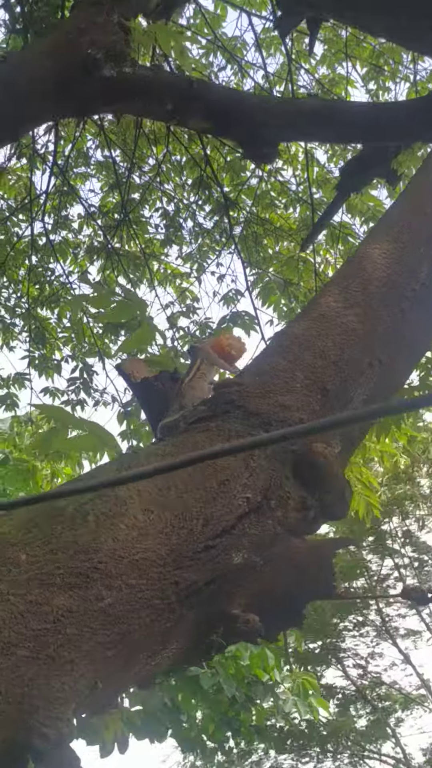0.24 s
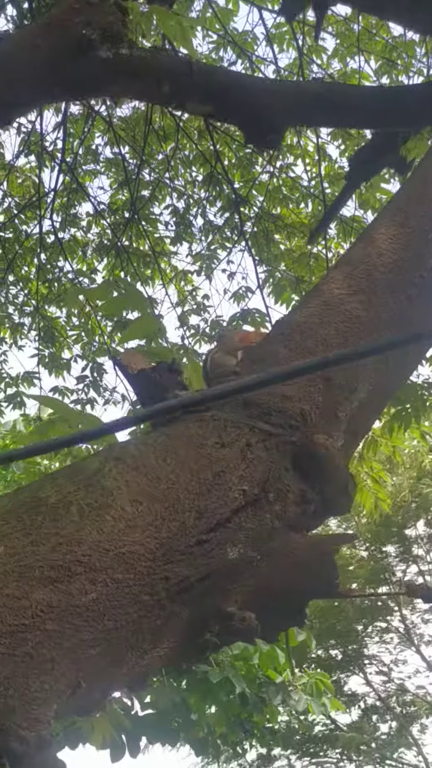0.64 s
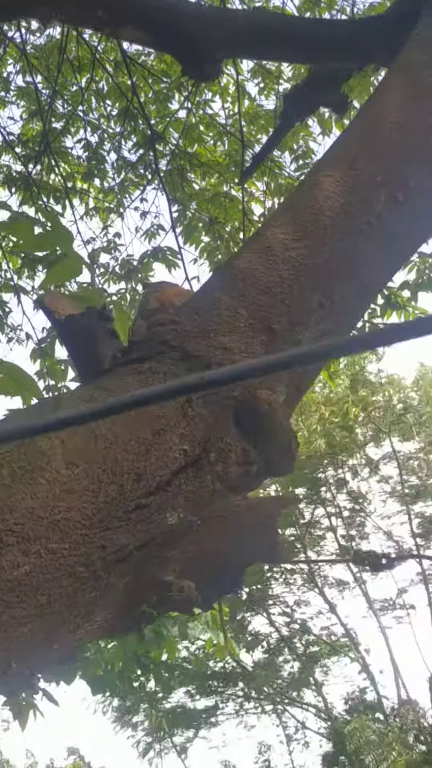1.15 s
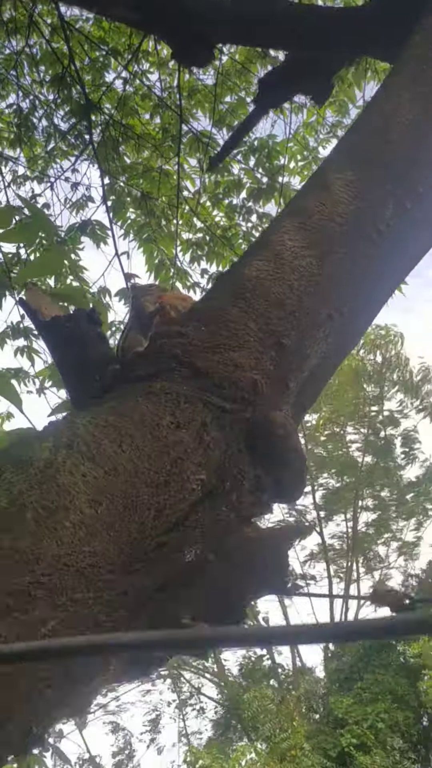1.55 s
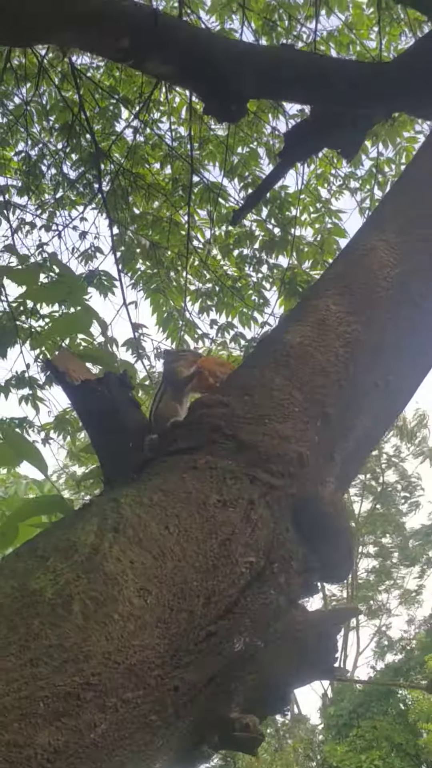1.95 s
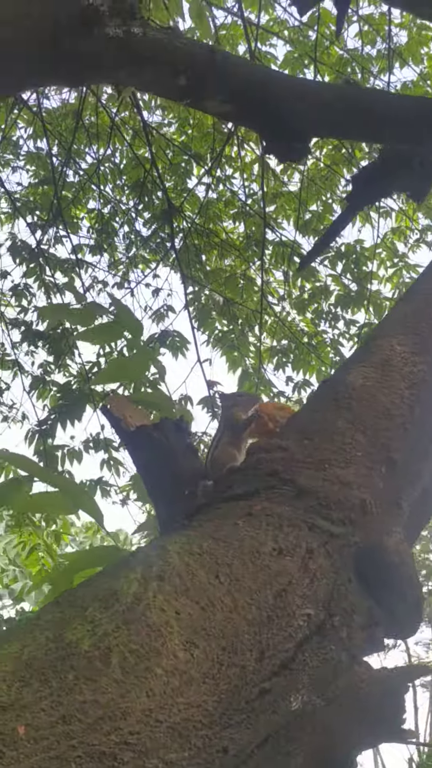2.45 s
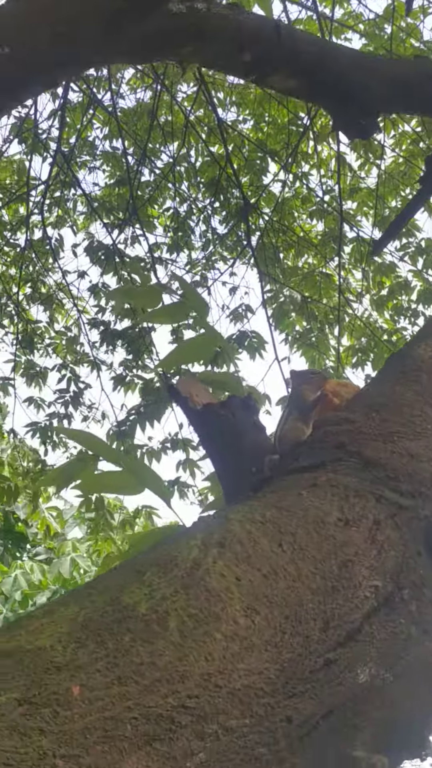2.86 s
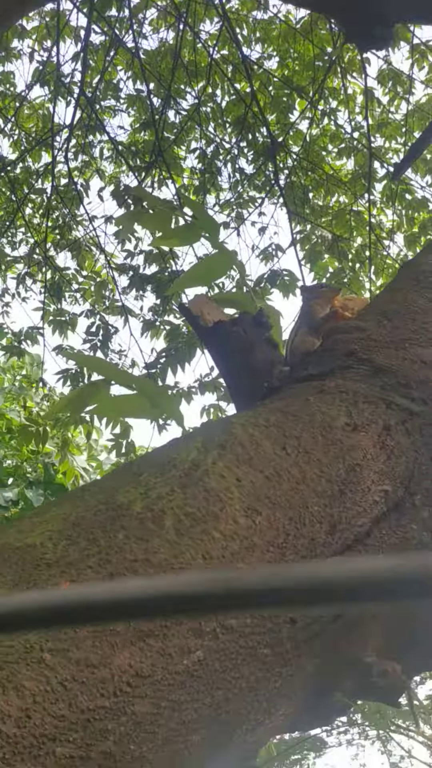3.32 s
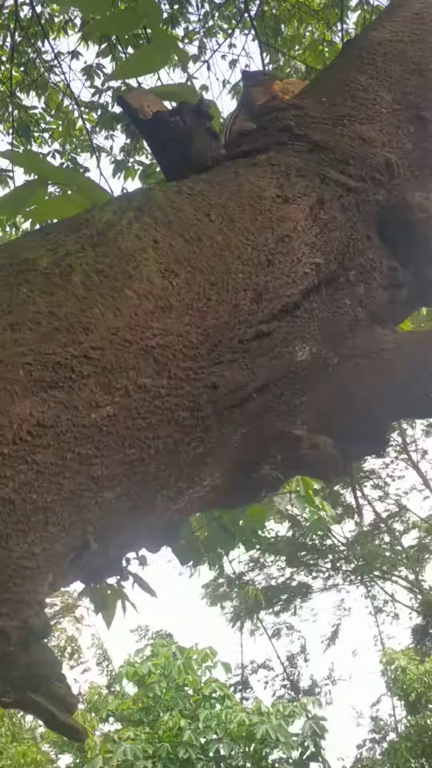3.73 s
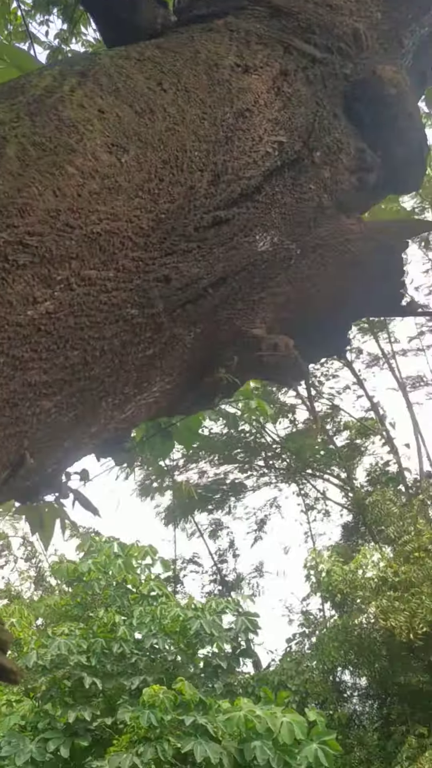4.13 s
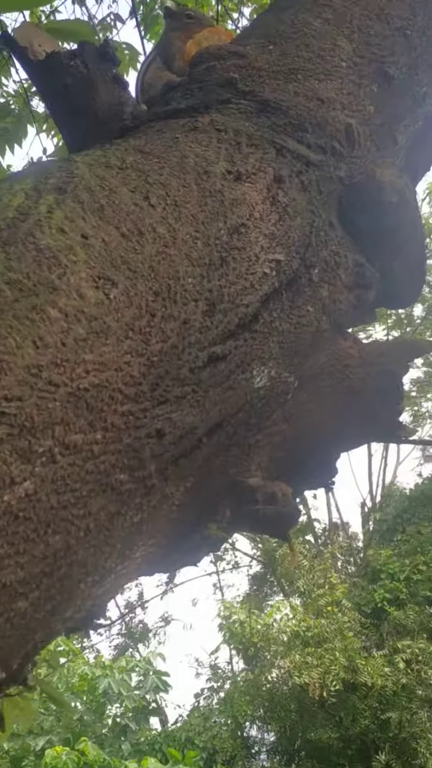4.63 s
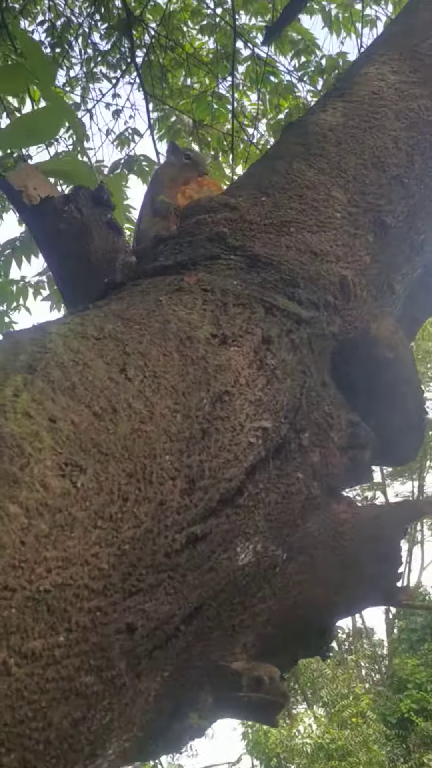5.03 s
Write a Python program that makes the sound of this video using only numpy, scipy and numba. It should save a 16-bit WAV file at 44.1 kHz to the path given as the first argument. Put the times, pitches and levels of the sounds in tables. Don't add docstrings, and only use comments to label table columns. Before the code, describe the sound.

A quiet outdoor bed of leaf hiss and distant town hum runs throughout, with soft, low wind buffeting that shifts between the two microphones of a handheld phone. A faint cloth brush comes at 0.7 s, and a tiny, high, falling bird whistle around 1 s. At about 2.05 s a squirrel in the tree gives a dry, harsh rasp, a quarter second of fast buzzing pulses with hissy breath, slightly echoed by trunk and branches. A very faint dove coos low at 2.5 and 2.95 s. A weaker, breathier rasp follows at 2.8 s and the strongest at 3.6 s, swelling late. Wind gusts get heavier from 3.7 s, mostly left. Faint whistles descend around 4.0-4.2 s. At 4.29 s a hard finger knock clicks sharply on the right, with a small rebound and dull thud. Cloth scrapes faintly at 4.45 s and more clearly at 4.7 s, then wind continues to the end.

```python
import sys
import numpy as np
from scipy import signal
from scipy.fft import rfft, irfft
from scipy.io import wavfile
from scipy.ndimage import uniform_filter1d
from numba import njit

SR = 44100
rng = np.random.default_rng(int(sys.argv[2]) if len(sys.argv) > 2 else 0)


def ratio_of_db(decibels):
    return 10 ** (np.asarray(decibels, float) / 20)


def to_wav(s):
    ch = np.atleast_2d(s).T
    pcm = np.round(np.clip(ch, -1, 1) * 32767)
    wavfile.write(sys.argv[1], SR, pcm.astype(np.int16))


N = 233020
TIME = np.arange(N) / SR
LOG_HZ = np.log(np.maximum(np.arange(N // 2 + 1) * SR / N, 1))
SILENT_DB = -36
# onset t/s, lead-in/s, length/s, loudest at share of the length, effort level/dB
RASPS = [
    (2.058, .03, .248, 0.5, -36.5),
    (2.80, .065, .216, .22, -38.3),
    (3.59, .022, .253, .6, -34.8),
]


def squirrel():
    # t/s, f/Hz
    pulses = [(2.04, 81), (2.12, 79.5), (2.2, 80.2), (2.36, 77.5), (2.76, 78.6), (2.88, 82.7), (2.96, 80.8),
              (3.58, 77.2), (3.62, 78.2), (3.68, 83.4), (3.74, 83.8), (3.88, 83.5)]
    # share of the cycle, level/dB
    rebounds = [(.33, -3.5), (.52, -2.5), (.74, -4)]
    # f/Hz, width/Hz, level/dB
    throat = [(860, 320, -16), (1065, 400, -8.5), (1390, 490, -6.5), (1680, 380, -8), (2558, 320, -16)]
    # low mouth mode f/Hz, high mouth mode f/Hz, breath f/Hz, breath level/dB, hiss level/dB
    mouths = [(1803, 2230, 4590, -16.5, -12), (1860, 2245, 4470, -9.5, -13.5),
              (1900, 2190, 4530, -17, -10.5)]
    # share of the breath f, width/Hz, level/dB
    breath = [(0.98, 650, 1.5), (1.25, 1500, -3)]
    # f/Hz, width/Hz, level/dB
    hisses = [(6250, 2460, -0.5), (7530, 2260, 1), (9070, 1500, -3.5), (11300, 2200, -2),
              (14700, 1500, -14)]
    left_lag = 19
    shade_db = 7
    air_per_db, rough_loud, rough_per_db = .55, .2, .2

    under_db, progress, which = effort()
    low_hz, high_hz, breath_hz, breath_db, hiss_db = np.transpose(mouths)[:, which]
    high_hz = high_hz + 60 * (2 * progress - 1)
    high_db = np.interp(progress, [0, 1], (-5.5, 2))
    breath_db = breath_db - air_per_db * under_db
    hiss_db = hiss_db - air_per_db * under_db / 2
    rough = np.clip(rough_loud - rough_per_db * under_db, 0, .7)

    hz = np.interp(TIME, *np.transpose(pulses))
    turns = np.cumsum(hz * (1 + .004 * walk(60))) / SR
    cycle, phase = turns.astype(int), turns % 1
    shimmer = ratio_of_db(1.0 * rng.standard_normal(N // 200))[cycle]
    first = np.exp(-phase * SR / hz / 3)
    snap = first.copy()
    for share, db in rebounds:
        since = (phase - share - .012 * walk(9)) % 1
        snap += ratio_of_db(db + 2.5 * walk(15)) * np.exp(-since * SR / hz / 3)
    gate = .45 + np.exp(-phase / 0.4)
    rasp = unit(gate * rng.standard_normal(N))
    drive = shimmer * (unit(snap - snap.mean()) + 1.6 * rough * rasp)

    voice = steep(drive, low_hz, 300) - ratio_of_db(high_db) * steep(drive, high_hz, 400)
    voice = voice / np.sqrt(uniform_filter1d(voice ** 2, size=400))
    voice = voice + modes(unit(first - first.mean()) + 1.7 * rasp, throat)

    gain = (ratio_of_db(under_db) - ratio_of_db(SILENT_DB)) * ratio_of_db(np.transpose(RASPS)[-1][which] - 2.5)
    breath = [(share * breath_hz, width, db) for share, width, db in breath]
    out = []
    for side in range(2):
        air = gate * rng.standard_normal(N)
        shaded = [(f, w, db - shade_db * (1 - side) * (f / 12000) ** 2) for f, w, db in hisses]
        hiss = ratio_of_db(hiss_db - 1.5) * modes(air, shaded)
        puffs = ratio_of_db(breath_db - 2.0) * modes(air, breath)
        near = gain * (voice + puffs + hiss)
        out.append(canopy(late(near, left_lag * (1 - side)), side))
    return np.array(out)


def effort():
    attack_s, release_s = .025, .054
    onset, lead, length, share, _ = np.transpose(RASPS)
    end = onset + length
    which = np.searchsorted(end[:-1] + 2 * release_s + attack_s, TIME)
    s = np.array([onset - lead - attack_s, onset - lead, onset, onset + share * length,
                  end, end + release_s, end + 2 * release_s])
    shape_db = [SILENT_DB, -23, -6.5, 0, -3.5, -19, SILENT_DB]
    under_db = np.interp(TIME, s.T.ravel(), np.tile(shape_db, len(RASPS)))
    progress = np.clip((TIME - onset[which]) / length[which], 0, 1)
    return under_db, progress, which


def modes(x, table):
    out = 0
    for hz, width, db in table:
        ring = unit(steep(x, hz * (1 + .025 * walk(9)), width))
        out = out + ratio_of_db(db + 1.2 * walk(14)) * ring
    return out


def canopy(x, side):
    # left delay/ms, left level/dB, right delay/ms, right level/dB
    echoes = [(3.63, -7, 3.65, -7), (5.71, -6, 5.2, -6), (8.9, -9, 9.4, -9), (14.6, -10, 13.3, -10),
              (23.0, -12, 26.2, -12), (37, -16, 41, -16)]
    sway_ms, leaf_t60_s, leaf_db = .12, .12, -1.5
    out = x
    for echo in echoes:
        delay_ms, db = echo[2 * side], echo[2 * side + 1]
        samples = np.round((delay_ms + sway_ms * walk(6)) * SR / 1000)
        out = out + ratio_of_db(db) * late(x, samples)
    tail = rng.standard_normal(8192) * np.exp(-np.log(1000) * TIME[:8192] / leaf_t60_s)
    tail = tail / np.sqrt(np.sum(tail ** 2))
    return out + ratio_of_db(leaf_db) * signal.fftconvolve(x, tail)[:N]


def wind():
    # t/s, level/dB, upper share/dB, left minus right/dB
    breeze = [(0, -54.5, -5, -5), (.8, -51, -7, -2), (1.6, -55.5, -0.5, 0), (3.0, -55, -3.5, 1),
              (3.6, -49.5, -3.5, 2.5), (3.9, -41.5, -2, 9), (4.25, -48, 2, 0), (4.4, -43, 8, 8),
              (4.52, -45, -2, 3), (4.75, -48, -4, 6.5), (4.9, -41.5, 0, 12.5), (5.28, -47.5, -3.5, 5.5)]
    # t/s, peak level/dB, left minus right/dB
    gusts = [(0.05, -40.5, -10), (0.218, -43.5, -8.5), (0.391, -45, 1), (0.579, -43, -1.5),
             (0.711, -44, -1), (0.839, -43, -1.0), (1.039, -45, -1.0), (1.269, -45, -4.5),
             (1.469, -46.5, -14), (1.905, -39.5, -5), (2.125, -37.5, -3), (2.222, -36.5, -8.0),
             (2.611, -43, 9), (3.083, -42, 5), (3.25, -38, 9), (3.339, -37.5, 12), (3.668, -36, 10),
             (3.779, -32, 11), (4.071, -29, 3.5), (4.439, -32, -7), (4.589, -34, 5), (4.719, -36.5, 1),
             (4.839, -32, 11.5), (5.239, -39, 14)]
    rise_s, fall_s, crest_db, gust_upper_db = .03, .07, 7.5, -8
    s, *columns = np.transpose(breeze)
    low_db, upper_db, pan_db = (np.interp(TIME, s, c) for c in columns)
    low = ears(ratio_of_db(low_db), pan_db) ** 2
    upper = ears(ratio_of_db(low_db + upper_db), pan_db) ** 2
    for start, db, gust_pan_db in gusts:
        swell = np.interp(TIME, np.cumsum([start, rise_s, fall_s]), [0, 1, 0])
        gust = ears(ratio_of_db(db - crest_db) * swell, gust_pan_db) ** 2
        low, upper = low + gust, upper + gust * ratio_of_db(2 * gust_upper_db)
    alike = np.clip((-45 - 10 * np.log10(low.mean(axis=0))) / 9, 0, .9)
    out = 0
    for hz, width, gain in ((39, 55, np.sqrt(low)), (95, 110, np.sqrt(upper) * ratio_of_db(-4.5))):
        shared, left, right = (unit(steep(rng.standard_normal(N), hz, width)) for _ in range(3))
        rumble = np.sqrt(alike) * shared + np.sqrt(1 - alike) * np.array([left, right])
        out = out + gain * ratio_of_db(2.0) * rumble
    return out


def knocks():
    # t/s, ring f/Hz, t60/s, right level/dB, left level/dB
    taps = [
        (4.2921, 250, .022, 4.5, -22),
        (4.3272, 285, 0.025, -13, -33),
        (4.316, 85, .07, -45, -17),
        (4.336, 150, 0.049, -45, -19),
    ]
    # t/s, width/s, level/dB
    nail = [
        (4.29246, 0.000064, -5.5),
        (4.29225, 0.00013, -31),
        (4.29285, 0.0001, -15),
    ]
    out = np.zeros((2, N))
    for start, hz, t60, right_db, left_db in taps:
        push_s = .0012 if right_db > 0 else .003
        t = np.maximum(TIME - start, 0)
        ring = np.cos(2 * np.pi * hz * t - .7) * np.exp(-np.log(1000) * t / t60)
        ring = ring * (1 - np.exp(-t / push_s))
        out += np.array([ratio_of_db(left_db) * late(ring, 47), ratio_of_db(right_db) * ring])
    for start, width, db in nail:
        out[1] += ratio_of_db(db) * np.exp(-((TIME - start) / width) ** 2)
    t = np.maximum(TIME - taps[0][0], 0)
    crackle = unit(steep(rng.standard_normal(N), 12300, 8000))
    out[1] += ratio_of_db(-32.5) * crackle * (t > 0) * np.exp(-t / 0.00078)
    return out


def brushes():
    # t/s, hold/s, fall/s, level/dB, left minus right/dB
    strokes = [
        (.705, .02, .02, -50, 4),
        (4.455, 0.061, 0.089, -49.5, 4.5),
        (4.683, 0.043, 0.037, -43, 4),
    ]
    # f/Hz, level/dB per Hz
    colour = [(530, -50), (900, -23), (1530, 1.5), (1720, -4.5), (2300, -2.5), (4520, -7.5), (12100, -11.5),
              (16000, -18)]
    rise_s = .014
    grains = rng.standard_normal((2, N)) * ratio_of_db(1.5 * walk(150))
    cloth = unit(irfft(rfft(grains) * ratio_of_db(over_hz(colour, LOG_HZ)), N))
    shape = 0
    for start, hold, fall, db, pan_db in strokes:
        swell = np.interp(TIME, np.cumsum([start, rise_s, hold, fall]), [0.016, 0.95, 0.65, 0])
        shape = shape + ears(ratio_of_db(db) * swell, pan_db)
    return cloth * shape


def bird():
    # t/s, length/s, start f/Hz, end f/Hz, level/dB
    notes = [(1.006, .048, 5070, 4520, -46.5), (1.052, .065, 4480, 4300, -55),
             (0.898, .02, 7100, 6900, -57), (1.025, 0.053, 4980, 4870, -53),
             (1.107, 0.023, 7240, 6800, -56), (3.992, .045, 6420, 6300, -56),
             (4.053, 0.047, 5660, 5600, -56.5), (4.121, 0.075, 4800, 4720, -53),
             (4.16, .035, 4650, 4250, -56), (4.187, 0.038, 4100, 4050, -49.5)]
    # t/s, length/s, start f/Hz, end f/Hz, level/dB
    coos = [
        (2.501, 0.362, 556, 519, -59.5),
        (2.94, .27, 523.4, 534, -59.5),
    ]
    # t/s, left minus right/dB
    turn_pan = [(1, 4), (4.2, 7)]
    flutter, wobble = ratio_of_db(2.2 * walk(150)), 1 + .012 * walk(200)
    song = sum(flutter * whistle(*note, wobble) for note in notes)
    song = ears(song, np.interp(TIME, *np.transpose(turn_pan)))
    blurred = np.array([canopy(song[side], side) for side in range(2)])
    dove = sum(whistle(*coo, 1 + 0.00786 * walk(20)) for coo in coos)
    return ratio_of_db(-7.5) * song + ratio_of_db(-9.5) * blurred + dove


def whistle(start, length, hz0, hz1, db, wobble):
    u = np.clip((TIME - start) / length, 0, 1)
    hz = (hz0 + (hz1 - hz0) * u) * wobble
    return ratio_of_db(db) * np.sin(2 * np.pi * np.cumsum(hz) / SR) * np.sin(np.pi * u) ** 0.31


def woods():
    # f/Hz, level/dB per Hz
    colour = [(35, -35), (60, -3), (184, -3.5), (250, -1.5), (492, -6), (1200, -7), (7940, -16),
              (16000, -26)]
    # f/Hz, left-right correlation
    likeness = [(60, 0.39), (130, 1), (290, 0.98), (640, 0.72), (1410, 0.078), (3100, 0.062),
                (6820, 0.0022), (15000, -0.05)]
    # f/Hz, left minus right/dB
    balance = [(60, 2), (110, -3), (200, -0.5), (380, -2), (700, -1), (2380, 5), (8120, 0.5), (15000, -4)]
    # t/s, level/dB
    loudness = [(0.0, -48), (5.28, -50.5)]
    mid, side = rfft(rng.standard_normal((2, N))) * ratio_of_db(over_hz(colour, LOG_HZ))
    alike = np.clip(over_hz(likeness, LOG_HZ), -.95, .95)
    mid, side = mid * np.sqrt(1 + alike), side * np.sqrt(1 - alike)
    pair = ears(np.array([mid + side, mid - side]), over_hz(balance, LOG_HZ))
    out, swell, half_octave = 0, walk(1.53), np.log(2) / 2
    for k in range(18):
        distance = np.clip((LOG_HZ - np.log(60)) / half_octave - k, -1, 1)
        band = np.cos(np.pi / 2 * distance) ** 2
        out = out + ratio_of_db(0.56 * swell + 0.87 * walk(8)) * irfft(pair * band, N)
    return unit(out) * ratio_of_db(np.interp(TIME, *np.transpose(loudness)))


def unit(x):
    return x / np.sqrt(np.mean(x ** 2))


def over_hz(table, log_hz):
    hz, value = np.transpose(table)
    return np.interp(log_hz, np.log(np.maximum(hz, 1)), value)


def walk(rate):
    k = int(SR / rate)
    held = np.repeat(rng.standard_normal(N // 200 + 1)[:N // k + 1], k)
    return unit(uniform_filter1d(uniform_filter1d(held, k), k)[:N])


def late(x, samples):
    return np.interp(np.arange(N) - samples, np.arange(N), x, left=0)


def ears(x, pan_db):
    return x * ratio_of_db(np.array([[.5], [-.5]]) * pan_db)


@njit
def svf(x, hz, width):
    y, b, l = np.empty(len(x)), 0., 0.
    for i in range(len(x)):
        g, k = np.tan(np.pi * hz[i] / SR), width / hz[i]
        v = (b + g * (x[i] + 1e-18 - l)) / (1 + g * (g + k))
        b, l, y[i] = 2 * v - b, l + 2 * g * v, k * v
    return y


def steep(x, hz, width):
    hz = hz + np.zeros(N)
    return svf(svf(x, hz, 1. * width), hz, 1. * width)


def scene():
    return squirrel() + wind() + knocks() + brushes() + bird() + woods()


def roll_off(x):
    return signal.sosfilt(signal.butter(12, 16510, fs=SR, output="sos"), x)


def record(dry):
    top_hz, dim_from_hz, dim_db = 15760, 2600, 5.5
    mask_to_hz, mask_under_db, mask_db = 3900, -30, 12
    mid_side = np.array([dry[0] + dry[1], dry[0] - dry[1]]) / 2
    hz, _, cells = signal.stft(mid_side, SR, nperseg=1024)
    size = abs(cells)
    chance = rng.exponential(size=(2, 171, N // 2048 + 2))
    chance = np.repeat(np.repeat(chance, 3, axis=1), 4, axis=2)
    dim = unit(ratio_of_db(-dim_db * chance[:, :len(hz), :cells.shape[2]]))
    quiet = size < 5 * np.median(size, axis=2, keepdims=True)
    rasp = size[:, (hz > 1500) & (hz < dim_from_hz)].max(axis=1, keepdims=True)
    masked = uniform_filter1d(size, size=9, axis=1) < rasp * ratio_of_db(mask_under_db)
    masked = masked & (hz[:, None] < mask_to_hz)
    dim = dim * np.where(masked, ratio_of_db(-mask_db), 1)
    gain = np.where(quiet & (hz[:, None] > dim_from_hz), dim, 1) * (hz[:, None] < top_hz)
    mid, side = signal.istft(cells * gain, SR, nperseg=1024)[1][:, :N]
    return roll_off(np.array([mid + side, mid - side]))


dry = scene()
out = record(dry)
to_wav(out)
```